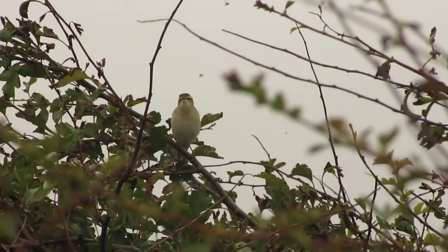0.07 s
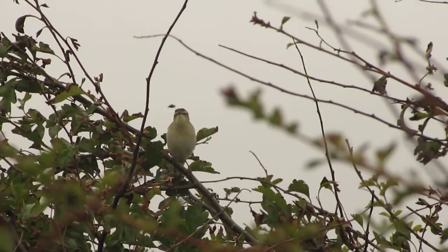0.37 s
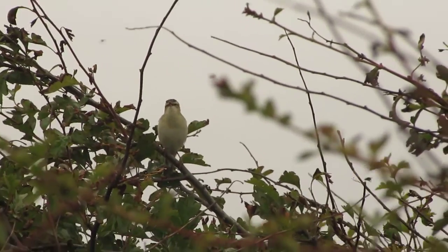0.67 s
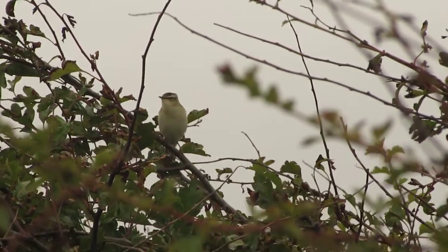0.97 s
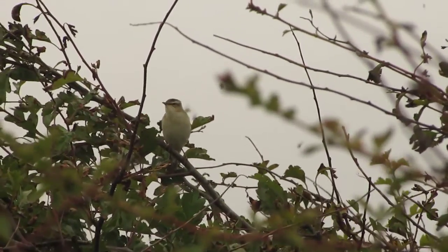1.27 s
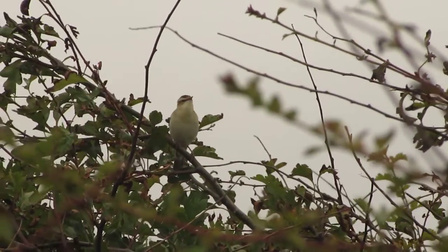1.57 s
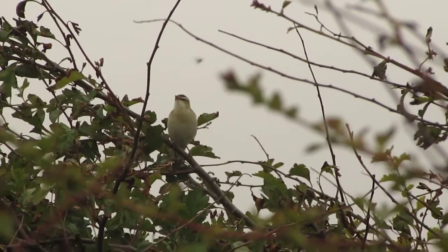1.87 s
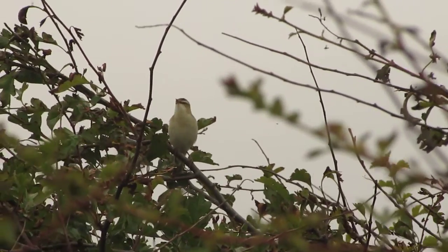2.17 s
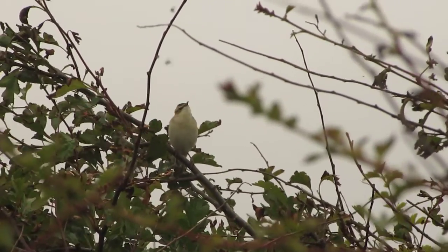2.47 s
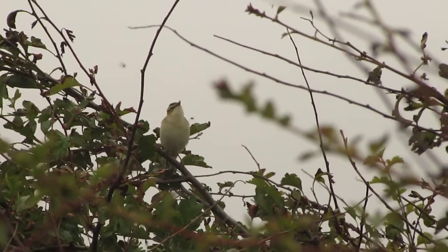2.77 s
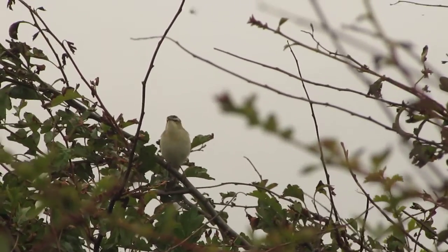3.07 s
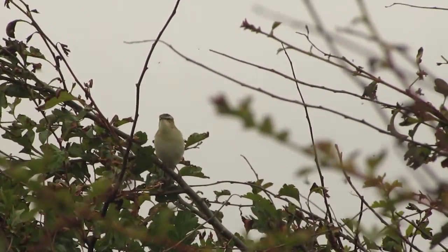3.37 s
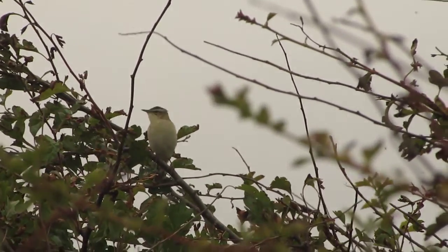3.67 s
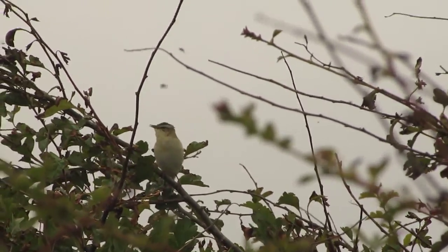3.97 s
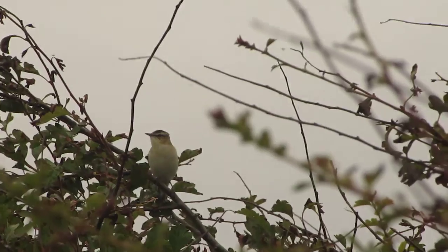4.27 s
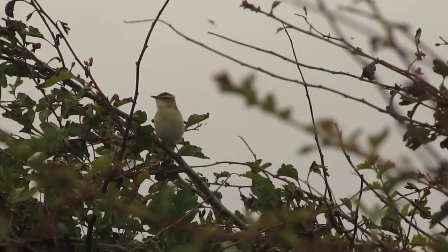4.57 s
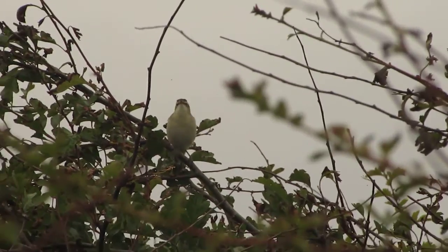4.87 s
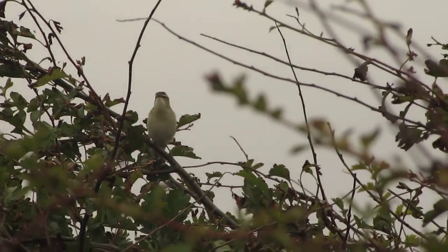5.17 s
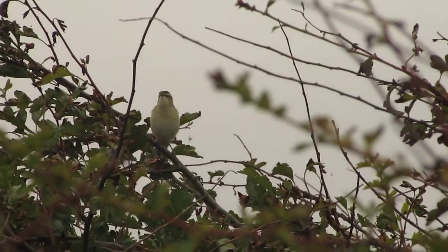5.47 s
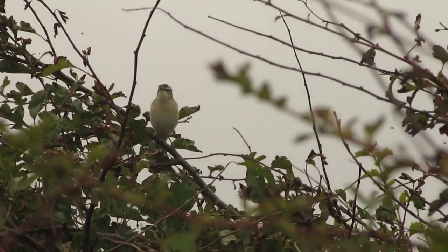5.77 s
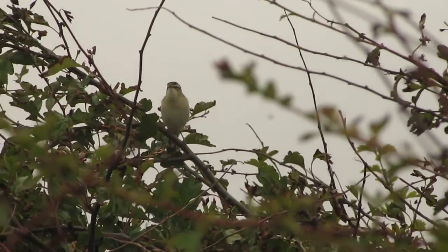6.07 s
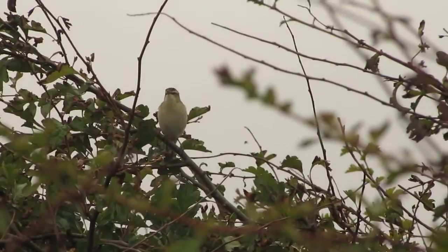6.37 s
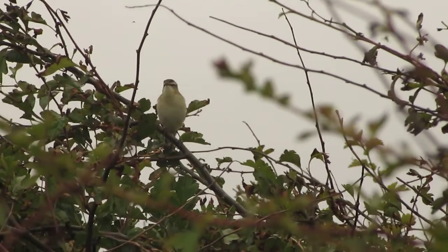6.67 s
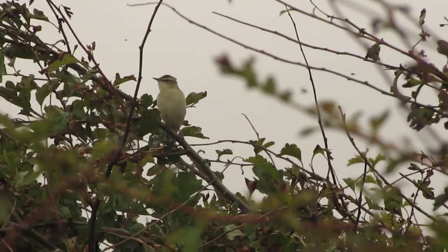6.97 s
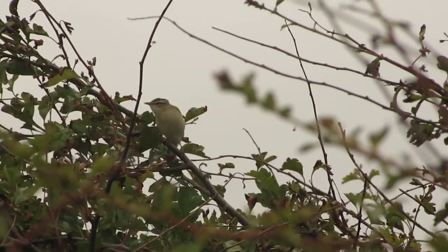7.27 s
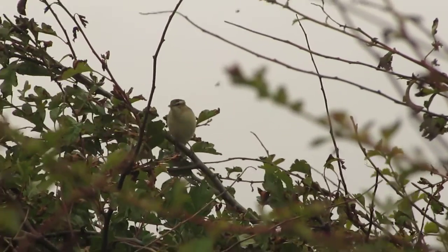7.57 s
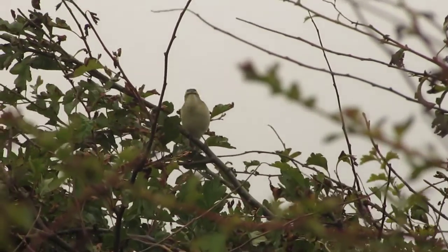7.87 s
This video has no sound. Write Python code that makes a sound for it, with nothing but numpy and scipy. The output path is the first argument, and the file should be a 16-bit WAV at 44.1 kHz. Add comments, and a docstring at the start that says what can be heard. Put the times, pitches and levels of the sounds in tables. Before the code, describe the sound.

Short high chirps and raspy ticks from a nearby songbird, with far-off trilling birds and gusts buffeting the microphone.

```python
"""A hushed field, with a distant engine droning and fading over the first few seconds.
From the start, far curlews bubble in swinging trills, and a warbler chatters close by in a bramble
hedge: two-voiced chirps from both sides of its syrinx, and dry three-part chats, tick-rasp-buzz.
Near the middle, far waders join with plain whistles and a breeze rises. Its eddies buffet the
microphone, hardest around six seconds, and ease off at the end while the birds carry on."""
import sys
import numpy as np
from scipy import signal
from scipy.fft import rfft, irfft, next_fast_len
from scipy.io import wavfile
from scipy.ndimage import uniform_filter1d, map_coordinates

SR = 44100
rng = np.random.default_rng(int(sys.argv[2]) if len(sys.argv) > 2 else 0)


def unload_audio(sound):
    """Save the sound as a 16-bit wav file, at the path given as the first command line argument."""
    columns = np.transpose(np.atleast_2d(sound))
    # keep every value between -1 and 1, then stretch to whole-number steps
    steps = np.round(np.clip(columns, -1, 1) * 32767)
    wavfile.write(sys.argv[1], SR, steps.astype(np.int16))


N = 353682


def amp(db):
    """Decibels to gain."""
    return 10 ** (np.asarray(db) / 20)


def unit(x):
    """Scale to rms 1."""
    return x / np.sqrt(np.mean(x ** 2) + 1e-20)


def along(points, hz):
    """Read (f/Hz, value) breakpoints on a log frequency axis."""
    f, v = np.transpose(points)
    return np.interp(np.log(hz + 1), np.log(f + 1), v)


def curves(rows, t):
    """Automation lanes: each column after the time, read at the times t."""
    s, *cols = np.transpose(rows)
    return [np.interp(t, s, c) for c in cols]


def wobble(rate, size):
    """Smooth random modulation, rate knots a second."""
    knots = rng.standard_normal(int(size * rate / SR) + 4)
    return map_coordinates(knots, [np.arange(size) * rate / SR])


def filtered(x, response):
    """Filter x with a response given as a function of frequency."""
    n = x.shape[-1]
    m = next_fast_len(n + n // 8)
    return irfft(rfft(x, m) * response(np.fft.rfftfreq(m, 1 / SR)), m)[..., :n]


def add(track, s, sound):
    """Mix a sound into a track from time s on."""
    at = round(s * SR) + np.arange(len(sound))
    inside = (at >= 0) & (at < N)
    track[at[inside]] += sound[inside]


def panned(balance_db):
    """Left and right gains for a balance; positive leans left."""
    return amp(np.array([[.5], [-.5]]) * balance_db)


def phase_of(hz):
    """Running phase of a pitch curve."""
    return 2 * np.pi * np.cumsum(hz) / SR


def rush(spectrum, alike):
    """Stereo noise of rms 1 with a colour (f/Hz, level/dB) and a left-right likeness (f/Hz, -1..1)."""
    def mid_side_gains(hz):
        spread = np.arccos(np.clip(along(alike, hz), -1, 1)) / 2
        return amp(along(spectrum, hz)) * [np.cos(spread), np.sin(spread)]
    mid, side = filtered(rng.standard_normal((2, N)), mid_side_gains)
    return unit(np.array([mid + side, mid - side]))


def echoes(x, decay):
    """Diffuse stereo reflections; each frequency dies at its own speed."""
    hz, t, noise = signal.stft(rng.standard_normal((2, SR // 2)), SR, nperseg=256)
    tail = signal.istft(noise * amp(-60 * t / along(decay, hz)[:, None]), SR, nperseg=256)[1]
    tail *= 1 - np.exp(-np.arange(tail.shape[1]) / SR / 0.00097)  # soft onset
    return signal.fftconvolve(x[None], tail / np.linalg.norm(tail[0]), axes=1)[:, :N]


def whistle(strokes, edge_s, waver, waver_hz, flutter_db, octave_db, rasp_db):
    """Nearly pure tones with a weak octave follow strokes (t/s, f/Hz, level/dB); fast glides roughen."""
    out = np.zeros(N)
    for rows in strokes:
        start, end = rows[0][0] - edge_s / 2, rows[-1][0] + edge_s / 2
        t = np.arange(start, max(end, start + edge_s), 1 / SR)
        hz, db = curves(rows, t)
        phase = phase_of(hz * (1 + waver * wobble(waver_hz, len(t))))
        gate = np.sin(np.pi / 2 * np.clip(np.minimum(t - start, end - t) / edge_s, 0, 1)) ** 2
        glide_speed = np.abs(np.gradient(np.log(hz))) * SR
        strain = np.tanh(uniform_filter1d(glide_speed, size=130) / 45)
        rasp = wobble(2196, len(t)) * np.sin(phase) + wobble(1905, len(t)) * np.cos(phase)
        tone = np.sin(phase) + amp(octave_db) * np.sin(2 * phase) + amp(rasp_db + 10 * strain) * rasp
        level = amp(db + flutter_db * wobble(waver_hz, len(t)))
        add(out, start, np.sqrt(2) * gate * level * tone)
    return out


def field():
    """The bed: a steady far hush with a band of road noise standing out of it."""
    # colour of the hush: f/Hz, level/dB
    hush_colour = [(24, -11), (45, 2), (75, -10.5), (120, -7), (190, -8), (310, -8), (480, -13.5),
                   (650, -13.5), (830, -9.5), (1250, -15.5), (2000, -15.5), (2600, -19.5), (8000, -30),
                   (14000, -35.5), (15600, -42)]
    # stereo image: f/Hz, left-right likeness
    alike = [(100, 0.35), (350, 0.77), (800, 0.43), (1500, 0.37), (4000, -0.04), (12000, 0.2)]
    # lean of the bed: f/Hz, left over right/dB
    balance = [(100, -2), (380, 1), (700, -7), (1200, 0), (2500, -1.5), (8000, 1)]
    # colour of the road: f/Hz, level/dB
    road_colour = [(400, -23), (660, -14.5), (760, -2.5), (900, -5.5), (1100, -10), (1500, -33),
                   (3000, -61)]
    hush = amp(-51 + 0.11 * wobble(2.98, N)) * rush(hush_colour, alike)
    road = amp(-57.5 + 0.35 * wobble(2.36, N)) * rush(road_colour, alike)
    return filtered(hush + road, lambda hz: panned(along(balance, hz)))


def engine():
    """A distant engine: one low, unsteady tone that sags and fades."""
    # the drone's course: t/s, f/Hz, level/dB
    drone = [(0, 85.5, -48), (.5, 83.16, -52), (1.2, 81, -52.5), (2.1, 81.7, -57), (2.5, 80.3, -79)]
    hz, db = curves(drone, np.arange(N) / SR)
    level = amp(db + 1.4 * wobble(5.5, N))
    return np.sqrt(2) * level * np.sin(phase_of(hz * (1 + 0.0158 * wobble(6.13, N))))


def curlew_trills():
    """Each trill note swings in pitch about seven times and ends in an upward flick."""
    # trill notes: t/s, length/s, f/Hz, level/dB, swell across the middle half/dB
    notes = [(-.126, 0.44, 1693, -61.5, 2), (.057, .4, 1883, -62, 1), (.062, .39, 2384, -61.5, 11),
             (0.429, 0.39, 1686, -56.5, 11), (0.651, 0.46, 1795, -58, 15), (1.194, .42, 1803, -54, 6),
             (1.322, 0.4, 1663, -56.5, 19), (1.849, .45, 1713, -61, -0.5), (2.187, 0.5, 2030, -69, 6),
             (2.448, .38, 2050, -67, 16), (2.9, .34, 2086, -66.5, 0), (3.369, .38, 2150, -63, 10),
             (3.875, 0.38, 2065, -60, 14.5), (4.383, .34, 2100, -53, 5), (4.881, .386, 2110, -58.5, 15),
             (5.393, .35, 2030, -56, 17), (5.878, .37, 2060, -49.5, 10), (6.368, .36, 2050, -46, 7.5),
             (6.861, 0.38, 2033, -58, 7), (7.348, 0.41, 2060, -56.5, 6), (7.836, .367, 2050, -64.5, -4)]
    # one note's contour: share of its length, pitch offset/share, vibrato depth/share, level/dB
    contour = [(0, -0.0344, 0.021, 3), (.07, -.02, 0.03, 4), (.33, .01, 0.083, 2), (.6, -.004, 0.083, -3),
               (.9, -.02, 0.061, -9), (.95, -0.018, 0.04, -7), (1, .14, 0.041, -6.5)]
    out = np.zeros(N)
    for s, length, hz, note_db, grows_db in notes:
        u = np.arange(0, 1, 1 / (length * SR))
        offset, depth, db = curves(contour, u)
        swing = np.cos(2 * np.pi * (6.7 * u - .75))
        gate = np.clip(np.minimum(u, 1 - u) / 0.018, 0, 1)
        swell_db = grows_db * np.clip(2 * u - 1, -.5, .5)
        # the voice is loudest at the crest of each swing, and moving air makes it fade in and out
        level = amp(note_db + db + swell_db + 2 * swing + 2.35 * wobble(22, len(u)))
        pitch = hz * (1 + offset + depth * swing + 0.00477 * wobble(34.1, len(u)))
        add(out, s, np.sqrt(2) * gate * level * np.sin(phase_of(pitch)))
    return out


def chirp_strokes(scoop_from_hz, scoop_to_hz):
    """The lower voice scoops, jumps to a shallow arch and drops; the upper adds a lead-in and a coda."""
    # long chirps: t/s, scoop/s, hold/s, top f/Hz, mid-hold dip/Hz, end f/Hz, level/dB, coda level/dB
    chirps = [(-.04, 0.0099, 0.036, 5890, 0, 5380, -24, -32.5),
              (1.175, 0.009, 0.031, 5980, 0, 4800, -26.5, -31.5),
              (2.16, .011, 0.047, 6164, 0, 4450, -26.5, -55),
              (2.936, 0.0079, 0.029, 6180, 0, 4570, -27.5, -30),
              (3.953, .02, .045, 6110, 3, 5160, -26.5, -48),
              (4.53, 0.0069, 0.04, 5990, 848, 4730, -26.5, -28.5),
              (6.53, 0.006, 0.038, 6070, 4, 5930, -26.5, -41)]
    jump_s, drop_s, lead_s, coda_s = 0.0025, 0.0111, .021, 0.0231
    crest, dip_width = 0.696, 0.138  # shares of the hold
    lower, upper = [], []
    for s, scoop, hold, top_hz, dip_hz, end_hz, db, coda_db in chirps:
        lead, end = s - scoop - .7 * lead_s, s + hold
        rise = [(s - scoop, scoop_from_hz, db - 15), (s - scoop / 2, .94 * scoop_to_hz, db - 0.8),
                (s - jump_s / 2, scoop_to_hz, db - 6.5)]
        u = np.linspace(jump_s / hold, 1, 13)
        dip = dip_hz * np.exp(-((u - .5) / dip_width) ** 2)
        pitch = top_hz * (1 - 0.049 * (1 - u / crest) ** 2) - dip
        held = list(zip(s + u * hold, pitch, db - 0.1 * dip))  # the voice weakens as it dips
        lower.append(rise + held + [(end + drop_s, end_hz, db - 15)])
        # the upper voice sweeps up ahead of the scoop, then takes over as the lower one drops
        upper.append([(lead, 4200, -51), (lead + lead_s / 2, 5632, -41), (lead + lead_s, 8800, -57.5)])
        upper.append([(end, 6600, coda_db - 7), (end + coda_s / 3, 6138, coda_db),
                      (end + coda_s, 5440, coda_db - 5)])
    return lower, upper


def syrinx_burst(half_s, centre_hz, fall, pulse_hz, jitter, width, skirt_db, air_db):
    """A rough buzz of the syrinx falls in pitch with its resonance; 40 ms long, rms 1 at its middle."""
    # colour of the throat: f/Hz, level/dB
    throat = [(600, -36), (1100, -11), (1550, 8), (2150, -10), (2650, 6.5), (3150, 4.5), (3650, 0.5),
              (4250, 1.5), (6200, -0.5), (7900, -7), (10000, -23.5), (12500, -12), (15500, -23)]
    t = np.arange(-SR // 50, SR // 50) / SR
    slide = np.exp(-fall * np.clip(t / half_s, -1, 1))
    pitch = pulse_hz * np.exp(0.075 * rng.standard_normal()) * slide
    phase = phase_of(pitch * np.exp(jitter * wobble(707, len(t))))
    k = np.arange(1, 25)[:, None]  # harmonic numbers
    resonance = 1 / (1 + (np.log(k * pitch / (centre_hz * slide)) / width) ** 2) + amp(skirt_db)
    # the membranes never close cleanly, so each overtone has its own phase and a hiss around it
    steady = np.exp(2j * np.pi * rng.random(k.shape))
    air = amp(air_db) * np.array([wobble(702, len(t)) + 1j * wobble(715, len(t)) for _ in k])
    harmonics = np.real((steady + air) * np.exp(1j * k * phase))
    voice = (amp(along(throat, k * pitch)) * resonance * harmonics).sum(0)
    swell = np.exp(-np.abs(t / half_s) ** 2.07)
    return voice * swell / np.sqrt(np.average(voice ** 2, weights=swell ** 2))


def chats():
    """Each chat steps downward: a thin tick, a bright rasp, a lower buzz."""
    # chats, timed at the rasp: t/s, level/dB, resonance f/Hz, tick trim/dB
    cues = [(.273, -35.5, 5440, -12), (.529, -35, 5240, -13), (.712, -34.5, 4870, -9),
            (0.867, -33.5, 5500, -11), (1.396, -32, 4980, -8.5), (1.577, -33.7, 5230, -10.5),
            (1.742, -33.7, 5510, -13), (1.898, -31, 6160, -13), (2.383, -32, 4930, -9.5),
            (2.661, -32, 5000, -12), (3.159, -32.5, 5030, -10), (3.318, -33, 5230, -10),
            (3.623, -32.5, 4730, -8.5), (4.217, -33.5, 5330, -12), (4.777, -30.7, 5030, -6.5),
            (4.953, -29.5, 4900, -10), (5.132, -32.5, 4970, -7.5), (5.956, -37, 5350, -15),
            (6.227, -36, 5300, -13.5), (6.756, -35, 5150, -8), (6.925, -32, 5570, -11),
            (7.076, -33.5, 5400, -5.5), (7.498, -34.5, 5650, -12), (7.655, -34.5, 5300, -11.5),
            (7.881, -34.5, 5100, -7)]
    tick_lead_s, buzz_delay_s = .013, .022
    out = np.zeros(N)
    for s, db, hz, tick_db in cues:
        start = s - .02  # centres the rasp on its cue
        tick = syrinx_burst(half_s=0.0039, centre_hz=1.1 * hz, fall=0.0194, pulse_hz=752,
                            jitter=0.076, width=0.32, skirt_db=-11.5, air_db=7)
        rasp = syrinx_burst(half_s=0.0058, centre_hz=hz, fall=0.13, pulse_hz=758,
                            jitter=0.0563, width=0.38, skirt_db=-27, air_db=-7.5)
        buzz = syrinx_burst(half_s=0.0084, centre_hz=.7 * hz, fall=0.13, pulse_hz=763.5,
                            jitter=0.0527, width=0.22, skirt_db=-29, air_db=-11.5)
        add(out, start - tick_lead_s, amp(db + tick_db + 4) * tick)
        add(out, start, amp(db - 0.86) * rasp)
        add(out, start + buzz_delay_s, amp(db + 0.2) * buzz)
    return out


def flick_strokes(scoop_from_hz, scoop_to_hz):
    """A short flick announces a chirp: the lower voice steps up under the upper voice's high arch."""
    # the lower voice's flicks: t/s, f/Hz, level/dB
    flicks = [(1.088, 5340, -32.5), (2.071, 6040, -29), (2.844, 5800, -31.5), (3.857, 5550, -29.5),
              (4.428, 6000, -27), (6.443, 5910, -32.5)]
    # the upper voice's arch, timed from the flick: t/s, f/Hz, level/dB
    arch = [(-.018, 3400, -58), (-.009, 4400, -42), (-.006, 6450, -39), (0, 8150, -53.5),
            (.007, 8250, -55.5), (.011, 10300, -63), (.02, 6600, -48), (.025, 6200, -48)]
    rise_s, hold_s = 0.0016, .008
    lower = [[(s - rise_s, scoop_from_hz, db + 1), (s, scoop_to_hz, db - 5.5), (s + rise_s, hz, db - 6),
              (s + hold_s, hz, db), (s + hold_s + rise_s, 0.95 * hz, db - 12)] for s, hz, db in flicks]
    upper = [[(s + after, hz, db) for after, hz, db in arch] for s, _, _ in flicks]
    return lower, upper


def warbler():
    """Both sides of the syrinx sing at once, one clear, one hoarse; the leaves scatter a short tail."""
    # the perch in the stereo image: f/Hz, left over right/dB
    perch = [(1300, 2), (2600, -7), (4400, 4.5), (6000, 3.5), (8200, 0), (13000, 0)]
    # the hedge's reverb: f/Hz, t60/s
    hedge = [(2000, 0.12), (6000, 0.12), (13000, 0.021)]
    scoop_hz = 4200, 4780  # the lower voice's opening slide
    flick_low, flick_high = flick_strokes(*scoop_hz)
    chirp_low, chirp_high = chirp_strokes(*scoop_hz)
    clear = whistle(flick_low + chirp_low, edge_s=.002, waver=.007, waver_hz=300,
                    flutter_db=1.4, octave_db=-35, rasp_db=-26)
    hoarse = whistle(flick_high + chirp_high, edge_s=.003, waver=.02, waver_hz=600,
                     flutter_db=2.2, octave_db=-32, rasp_db=-14)
    chirps, chatter = clear + hoarse, chats()
    direct = filtered(chirps + chatter, lambda hz: panned(along(perch, hz)))
    return direct + echoes(amp(-9.5) * chirps + amp(-12) * chatter, hedge)


def wader_whistles():
    """Plain far whistles: each glides along an arch and is loudest in its middle."""
    # whistled notes: t/s, length/s, f/Hz, glide/Hz, arch/Hz, level/dB
    notes = [(3.56, .22, 1840, 153, -0.5, -66), (4.205, 0.22, 2020, 0, 2, -66),
             (4.606, .125, 2460, -120, 55, -58), (5.07, 0.063, 2500, 80, 0, -62),
             (5.555, 0.38, 1383, -23, 13.5, -64), (5.98, .06, 3010, -380, 0, -62),
             (6.02, .1, 2445, -150, 0, -66), (6.425, 0.12, 2540, 0, 597, -57),
             (6.485, .17, 1590, 3, -55, -62), (7.083, .5, 1564, 139.5, 44.5, -57.5),
             (7.441, 0.13, 2340, -100, 104, -58.5), (7.515, 0.13, 2990, 90, 102, -66),
             (7.781, 0.25, 1595, -59, 0.5, -66)]
    u = np.linspace(0, 1, 11)
    arch = 1 - (2 * u - 1) ** 2
    strokes = []
    for s, length, hz, glide_hz, arch_hz, db in notes:
        pitch = hz + glide_hz * (u - .5) + arch_hz * arch
        strokes.append(np.transpose([s + length * u, pitch, db - 4 * (1 - arch)]))
    return whistle(strokes, edge_s=.02, waver=0.0093, waver_hz=41.4,
                   flutter_db=0.5, octave_db=-46, rasp_db=-47)


def far_birds():
    """Whistles and trills cross the open land and reach the left microphone port first."""
    # the land's reverb: f/Hz, t60/s
    land = [(1000, 0.26), (3000, 0.12)]
    left_lead_s = .00009
    calls = wader_whistles() + curlew_trills()
    placed = filtered(calls, lambda hz: np.exp(1j * np.pi * hz * left_lead_s * np.array([[1], [-1]])))
    return amp(5) * placed + amp(-8) * echoes(calls, land)


def wind():
    """Eddies buffet each microphone port; the louder the rumble, the more high flutter it has."""
    # the wind's rumble on the microphone, with a brief random flicker near seven seconds: t/s, level/dB
    rumble = [(0.0, -42.5), (0.67, -50.5), (3.08, -54), (3.17, -44), (3.75, -45), (3.84, -32), (4.69, -42),
              (5.18, -25.5), (5.45, -32), (5.67, -22.5), (5.96, -28.5), (6.1, -19), (6.14, -28),
              (6.68, -25.5), (6.92, -38.5), (6.97, -24), (7.04, -36), (7.08, -23.5), (7.1, -35.5),
              (7.3, -25.5), (7.44, -34), (7.53, -30), (7.86, -53.5), (8.02, -42)]
    # the side the wind strikes: t/s, left over right/dB
    sides = [(0, 2.5), (2.7, 3), (3.5, -8), (4.9, -11.5), (5.7, -4.5), (7.8, 0)]
    # colour of the deep buffeting: f/Hz, level/dB
    buffet_colour = [(10, -22), (22, -3.5), (40, -0.5), (68, -1.5), (95, -7), (140, -21), (250, -43),
                     (500, -95)]
    # colour of the flutter above it: f/Hz, level/dB
    flutter_colour = [(50, -23), (90, -4), (120, 4), (170, -5.5), (250, -18), (400, -30), (800, -57),
                      (2000, -89)]
    # sudden eddies hitting a port: t/s, level/dB
    thumps = [(5.16, -34.5), (6.55, -40.5)]
    t = np.arange(N) / SR
    (rumble_db,), (side_db,) = curves(rumble, t), curves(sides, t)
    lumps = amp(1.56 * np.array([wobble(14, N), wobble(18, N)]))
    buffet = amp(rumble_db + 1.5) * unit(lumps * rush(buffet_colour, alike=[(50, 0.14)]))
    flutter = amp(1.507 * rumble_db + 2.5) * unit(lumps * rush(flutter_colour, alike=[(150, 0.056)]))
    hits = sum(amp(db) * np.exp(-((t - s) / 0.012) ** 2) for s, db in thumps)
    thud = rush([(60, -20), (180, 3), (500, -13), (800, -35), (2000, -80)], alike=[(150, .05)])
    return (buffet + flutter + hits * thud) * panned(side_db)


def scene():
    """The mix: near bird, far birds and breeze over the field and the engine."""
    return warbler() + far_birds() + wind() + field() + engine()


def record(dry):
    """A brick-wall low-pass: nothing passes above the band limit."""
    top_hz = 15780
    return filtered(dry, lambda hz: hz < top_hz)


dry = scene()
out = record(dry)
unload_audio(out)
```